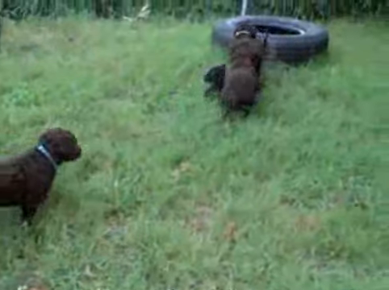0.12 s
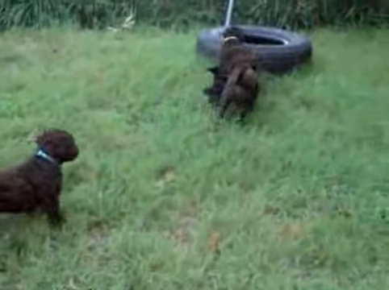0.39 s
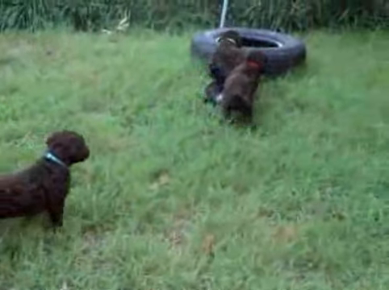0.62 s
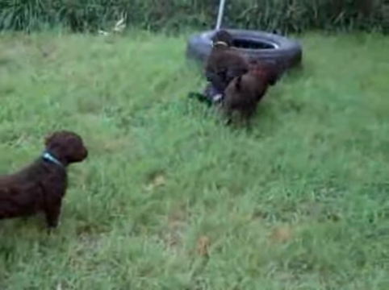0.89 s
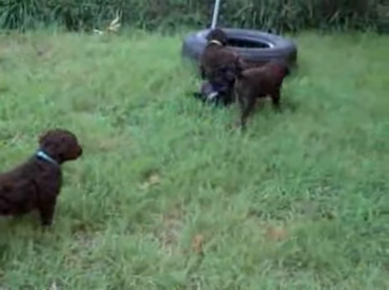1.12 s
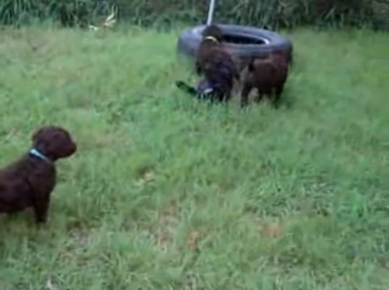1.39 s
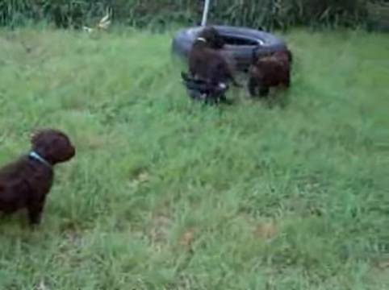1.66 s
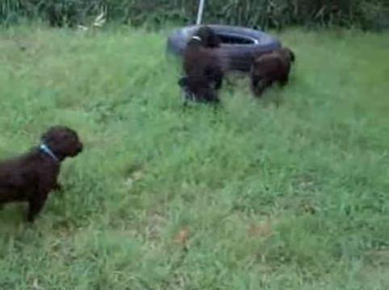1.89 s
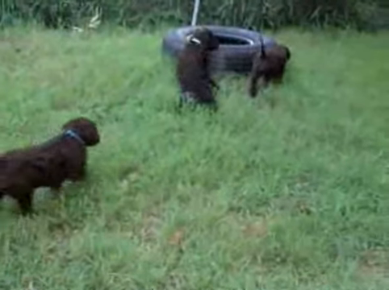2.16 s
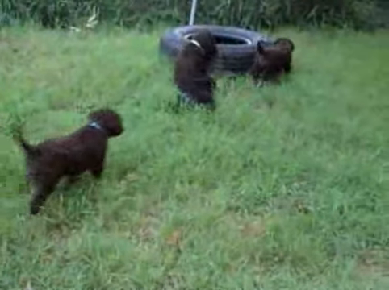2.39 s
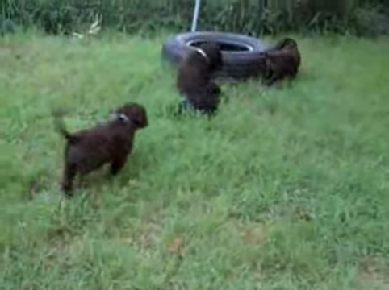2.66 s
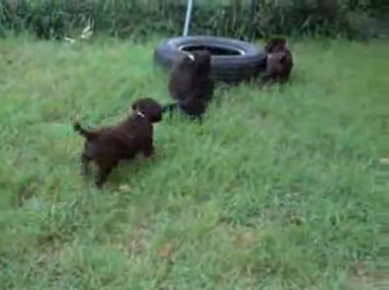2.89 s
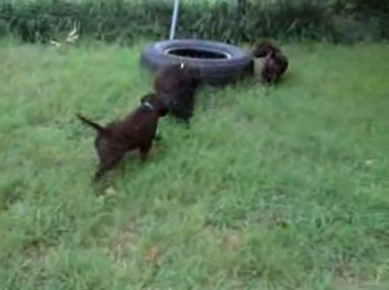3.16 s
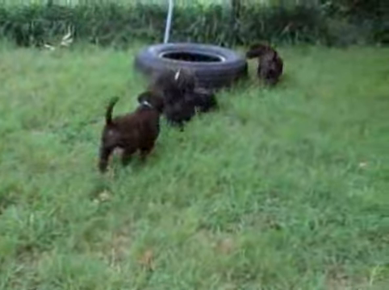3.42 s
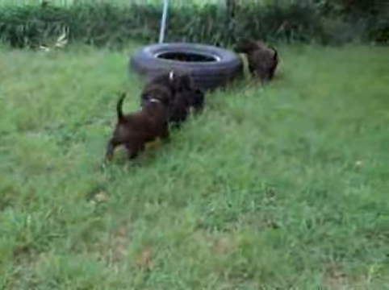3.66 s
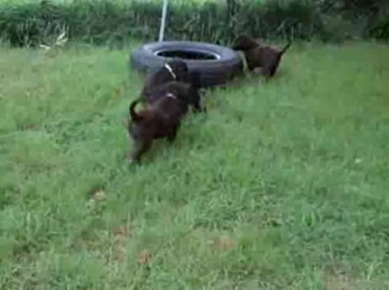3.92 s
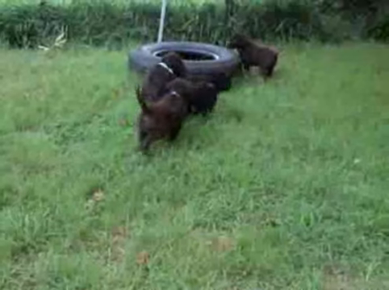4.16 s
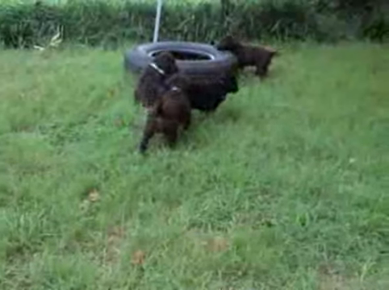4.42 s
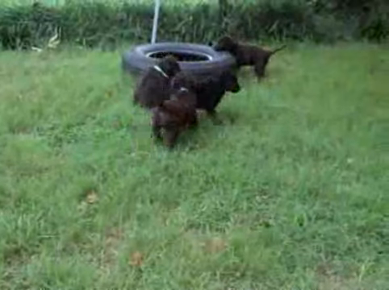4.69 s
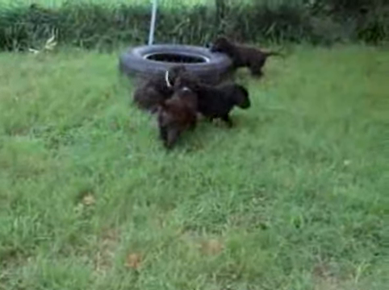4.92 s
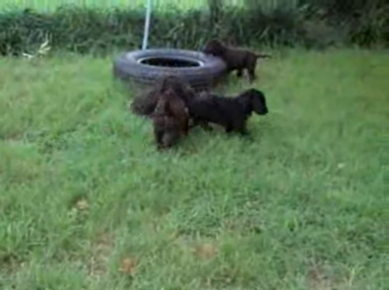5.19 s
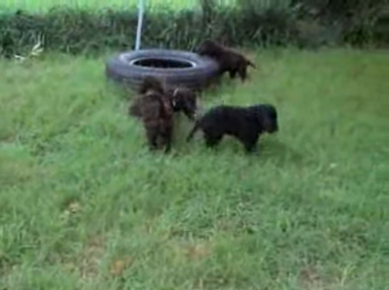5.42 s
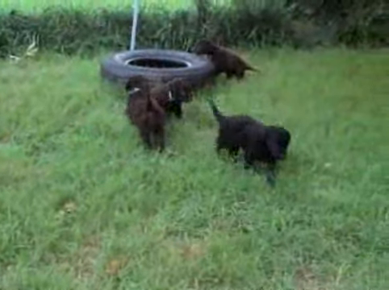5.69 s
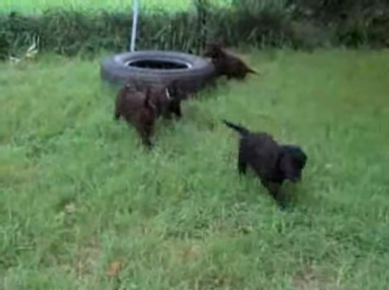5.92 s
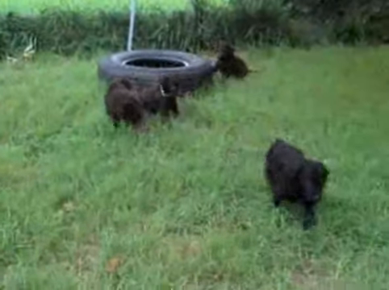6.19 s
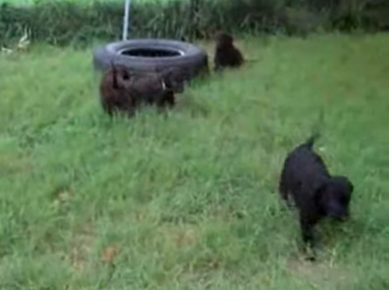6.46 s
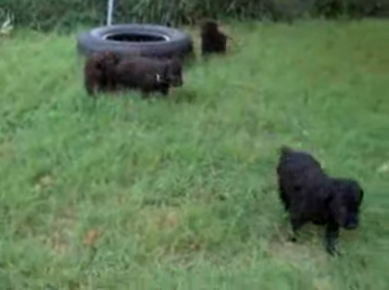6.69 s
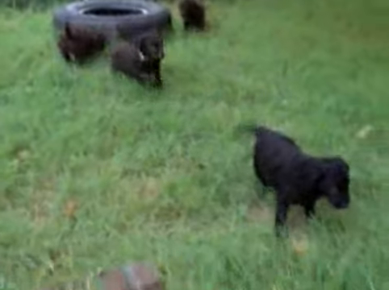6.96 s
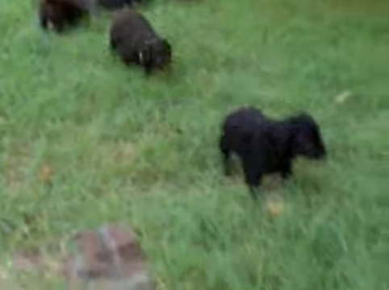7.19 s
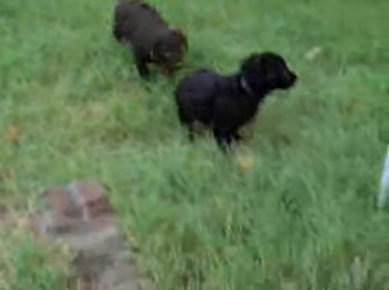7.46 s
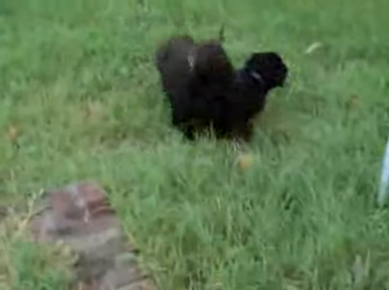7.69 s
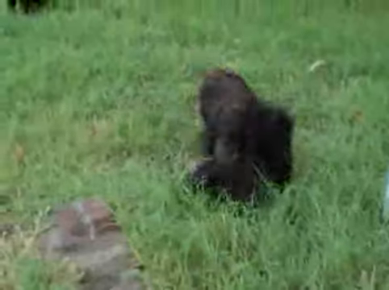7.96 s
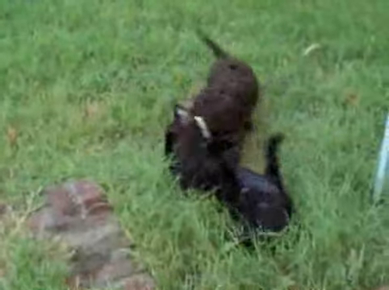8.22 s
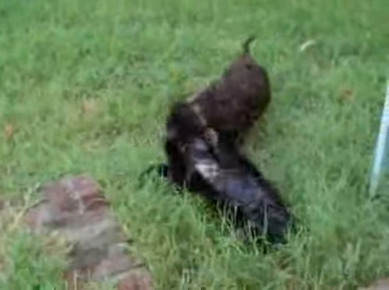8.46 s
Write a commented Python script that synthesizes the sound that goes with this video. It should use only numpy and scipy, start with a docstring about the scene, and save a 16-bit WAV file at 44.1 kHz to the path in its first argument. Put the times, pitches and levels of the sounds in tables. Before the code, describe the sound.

Summer insects shimmer continuously in a grassy yard, brief trills repeating from the bushes, while tumbling puppies give just one tiny raspy yelp and a dull knock.

```python
"""A steady insect chorus, over distant traffic, rumble and machine hum: shaped noise and wavering tones.
In 16 ms steps the level flutters in bands and the top treble blinks on and off.
A pulsing trill from the bushes follows: overtones ringing in a body. Puppies tumble on a lawn on a
summer day, far under it: a hoarse yelp (rough pulses and breath through a throat), later a soft bump
(a decaying sine). Muting of sunken bands leaves a watery grain."""
import sys
import numpy as np
from scipy import signal
from scipy.fft import rfft, irfft
from scipy.io import wavfile
from scipy.ndimage import uniform_filter1d

SR = 44100
rng = np.random.default_rng(int(sys.argv[2]) if len(sys.argv) > 2 else 0)


def int16_out(signal):
    """Quantize to a 16-bit WAV file."""
    q = np.round(np.clip(np.atleast_2d(signal).T, -1, 1) * 32767)
    wavfile.write(sys.argv[1], SR, q.astype(np.int16))


def voltage_ratio(level):
    """Linear amplitude factor for a level in decibels (scalar or array-like)."""
    return 10 ** (np.asarray(level, float) / 20)


N = 378814
HOP, BLINK_S = 128, .016
FFT_SIZE = 8 * HOP
HZ, FRAME_S = np.fft.rfftfreq(FFT_SIZE, 1 / SR), np.arange(N // HOP + 9) * HOP / SR

# insect chorus, relative swell of its loudest band: t/s, level/dB
CHORUS_SWELL = [(0, -0.5), (2.5, -0.5), (3.9, 0), (4.15, -2), (4.8, -1.5), (6.2, -1.5), (6.9, -4.5),
                (7.2, 0), (7.6, -4.5), (8, -1.5), (8.59, -4)]
# insect chorus, relative spectrum: f/Hz, density/dB per Hz
CHORUS_SPECTRUM = [(2300, -27), (3300, -10), (4000, -9), (4700, -12.5), (5200, -8), (5720, -2),
                   (5980, -1.5), (6120, -13), (6400, -11.5), (7250, -13.5), (7330, -50.5), (7600, -40),
                   (8550, -51), (8680, -25), (10000, -43.5), (10200, -89.5)]
# long dropouts of the top treble: t/s, length/s
TREBLE_GAPS = [(.33, .16), (.94, .31), (2.24, .27)]
# distant traffic drawing away: t/s, level/dB
TRAFFIC_LEVEL = [(0, -41.5), (2.4, -41), (4.3, -42.5), (6.3, -43.5), (8.59, -44.5)]
# traffic wash, relative spectrum: f/Hz, density/dB per Hz
TRAFFIC_SPECTRUM = [(300, -12), (700, -3.5), (1200, -3.5), (2000, -1.5), (2800, -1.5), (3800, -9.5),
                    (5000, -47.5), (7000, -42.5)]
# low rumble, relative spectrum: f/Hz, density/dB per Hz
RUMBLE_SPECTRUM = [(12, -10.5), (28, 1.5), (45, -1), (80, 2.5), (115, -1), (135, -6.5), (250, -8.5),
                   (400, -10), (800, -17), (1600, -54.5)]
# far machines: f/Hz, wavering/Hz, level/dB (before the tone and fuzz weights), from/s, to/s
HUM_TONES = [(54.2, 0.973, -45, -1, 10), (92.8, 2.13, -49.5, 1.2, 5.9), (114.3, 3.12, -55, -1, 10),
             (174.4, 2.03, -58, -1, 10), (241.1, 3.2, -60, -1, 10), (290, 2.3, -63, -1, 10),
             (828, 3.01, -66, -1, 10)]
# trills in the bushes: t/s, length/s, level/dB (before the taper), centre of the ringing f/Hz
TRILL_CALLS = [(0.528, .16, -42.5, 4000), (1.253, 0.097, -42.5, 4070), (1.504, .13, -47, 3840),
               (1.907, .13, -42, 4040), (2.412, 0.13, -41, 4080), (2.573, .13, -42, 4000),
               (3.235, 0.2, -40.5, 3920), (3.927, 0.14, -41, 3820), (4.14, .19, -41, 3960),
               (4.48, .21, -41, 4020), (4.97, .23, -40, 3890), (5.654, 0.15, -43.5, 3930),
               (6.196, .14, -43, 3980), (6.654, .13, -40.5, 4220), (6.752, .12, -41.5, 3880),
               (7.424, 0.24, -38.5, 3960), (7.72, .09, -45, 3950), (8.25, .3, -43.5, 3880)]
# yelp: t/s, length/s, effort/dB, starting pitch f/Hz
YELPS = [(3.152, .075, -38.5, 345)]
# throat resonances: f/Hz, width/Hz, level/dB
THROAT_RESONANCES = [(640, 350, -3), (830, 460, -4.5), (1020, 420, -3.5)]
# bodies bumping: t/s, peak/dB, ring f/Hz, time to fall 30 dB/s
BODY_BUMPS = [(7.670, -33, 534, 0.01)]

CHORUS_DB, RUMBLE_DB = -35.5, -42
# share of the time the top treble is heard, outside the gaps
TREBLE_SHARE, TREBLE_SHARE_GAIN_PER_S = .43, .025
TREBLE_DB, TREBLE_FADE_DB_PER_S = 3, 0.8
TRILL_PULSES_HZ, TRILL_FALL_HZ_PER_S = 195.5, 1700
YELP_RISE_S, YELP_FADE_DB, YELP_SAG_HZ_PER_S, YELP_BREATH_SHARE = .004, -18, 600, .68
NOTCH_HZ, NOTCH_HALF_WIDTH_HZ = 3900, 95


def evened(x):
    """Scales to rms 1."""
    return x / np.sqrt(np.mean(x ** 2) + 1e-20)


def read(points, hz):
    """Reads a spectrum on a log-frequency axis."""
    f, value = np.transpose(points)
    return np.interp(np.log(hz + 1), np.log(f + 1), value)


def follow(rows, t):
    """Reads a two-column curve at the times t."""
    s, value = np.transpose(rows)
    return np.interp(t, s, value)


def add(mix, s, sound):
    """Mixes a sound in at s seconds."""
    part = mix[round(s * SR):][:len(sound)]
    part += sound[:len(part)]


def resonate(x, hz, width_hz):
    """Resonance: shifts the curve hz down to zero, smooths twice, shifts back."""
    turn = np.exp(2j * np.pi * np.cumsum(hz * np.ones(len(x))) / SR)
    r = np.exp(-np.pi * width_hz / SR)
    smooth = signal.lfilter([(1 - r) ** 2], [1, -2 * r, r * r], x / turn)
    return 2 * (turn * smooth).real


def noise(field_db):
    """Random short-time spectra under a frames x bins field of dB, at rms 1."""
    a, b = np.moveaxis(rng.standard_normal((len(FRAME_S), len(HZ), 2)), 2, 0)
    z = (a + 1j * b) * voltage_ratio(field_db)
    return evened(signal.istft(z.T, nperseg=FFT_SIZE, noverlap=FFT_SIZE - HOP)[1][:N])


def patches(frames, bins):
    """A smooth random field over time and frequency, at rms 1."""
    field = rng.standard_normal((len(FRAME_S), len(HZ)))
    field = uniform_filter1d(field, frames, axis=0)
    return evened(uniform_filter1d(field, bins, axis=1))


def blinks(carry):
    """One random value per 16 ms step, held over its frames; carry ties it to the one before."""
    step = (FRAME_S / BLINK_S).astype(int)
    draws = rng.standard_normal(step[-1] + 2)
    return evened(draws[1:] + carry * draws[:-1])[step]


def top_treble_db():
    """The top treble blinks on and off at random in short steps, mostly off in the gaps."""
    gap = sum((FRAME_S > s) & (FRAME_S < s + length) for s, length in TREBLE_GAPS)
    share = np.where(gap, .04, TREBLE_SHARE + TREBLE_SHARE_GAIN_PER_S * FRAME_S)
    off = 1 / (1 + np.exp(-1.7 * blinks(.4))) > share  # the logistic makes the draw near uniform
    edge_hz = np.where(blinks(.8) > .2, 6050, 6400)
    level_db = TREBLE_DB - TREBLE_FADE_DB_PER_S * FRAME_S - 26 * off + 3 * blinks(0.085)
    return level_db[:, None] * (HZ > edge_hz[:, None]) * (abs(HZ - 7960) > 660)


def band_flutter_db():
    """The level of three bands flutters in short random steps, each band by itself."""
    flutter_db = 2.8 * blinks(-.3)[:, None] * (HZ > 5250) * (HZ < 6050)
    flutter_db += 2.2 * blinks(-.2)[:, None] * (HZ > 4300) * (HZ < 5250)
    flutter_db += 3.5 * blinks(0.83)[:, None] * (abs(HZ - 7960) < 660)
    return flutter_db


def chorus():
    """Many insects blur into noise bands; apart from the insects, band levels flutter and the top treble drops
    out in 16 ms steps."""
    swell_db = follow(CHORUS_SWELL, FRAME_S)[:, None] * (HZ > 5250) * (HZ < 6050)
    field = read(CHORUS_SPECTRUM, HZ) + swell_db + 1.35 * patches(6, 5)
    return voltage_ratio(CHORUS_DB) * noise(field + band_flutter_db() + top_treble_db())


def traffic():
    """Road wash: lightly mottled noise under a level curve."""
    wash = noise(read(TRAFFIC_SPECTRUM, HZ) + .8 * patches(10, 4))
    return voltage_ratio(follow(TRAFFIC_LEVEL, np.arange(N) / SR)) * wash


def rumble():
    """Low rumble: steady noise weighted in its spectrum."""
    spectrum = rfft(rng.standard_normal(N)) * voltage_ratio(read(RUMBLE_SPECTRUM, np.fft.rfftfreq(N, 1 / SR)))
    return voltage_ratio(RUMBLE_DB) * evened(irfft(spectrum, N))


def machine_hum():
    """Far machines: sines wandering in pitch, each wrapped in a narrow band of noise."""
    t, hum = np.arange(N) / SR, np.zeros(N)
    for hz, width_hz, db, start, stop in HUM_TONES:
        fuzz = evened(resonate(rng.standard_normal(N), hz, 4 * width_hz))
        drift = evened(uniform_filter1d(rng.standard_normal(N), 4000))
        wander = np.cumsum(drift) * width_hz / SR  # turns
        heard = np.clip(np.minimum(t - start, stop - t) / 0.52, 0, 1)
        tone = np.sin(2 * np.pi * (hz * t + wander))
        hum += heard * voltage_ratio(db) * (1.61 * tone + 0.45 * fuzz)
    return hum


def trill():
    """Steady pulses ring in a body; echoes in the foliage make each overtone swell and slip by itself."""
    t = np.arange(N) / SR
    waver = uniform_filter1d(rng.standard_normal((len(FRAME_S), 9, 2)), 16, axis=0)
    waver = uniform_filter1d(waver, 8, axis=0)
    swell_db, slip_turns = 3.5 * evened(waver[..., 0]), .16 * evened(waver[..., 1])
    pulses, calls = np.zeros(N + SR), np.zeros(N)
    for k in range(9):  # overtones 16 to 24
        turns = (16 + k) * TRILL_PULSES_HZ * t + np.interp(t, FRAME_S, slip_turns[:, k])
        pulses[:N] += voltage_ratio(np.interp(t, FRAME_S, swell_db[:, k])) * np.cos(2 * np.pi * turns)
    for s, length, db, hz in TRILL_CALLS:
        part = pulses[round(s * SR):][:round(length * SR)]
        ring_hz = hz + TRILL_FALL_HZ_PER_S * np.linspace(length / 2, -length / 2, len(part))
        ring = resonate(part, ring_hz, 430) + .45 * part
        add(calls, s, voltage_ratio(db) * evened(ring) * signal.windows.tukey(len(part), .9))
    return calls


def yelp(length, effort_db, top_hz):
    """Uneven pulses and puffs of breath pass a small throat; the pitch sags as the effort fades."""
    t = np.arange(0, length, 1 / SR)
    hz = top_hz - YELP_SAG_HZ_PER_S * t
    jitter = 0.25 * uniform_filter1d(rng.standard_normal(len(t)), 100)
    turns = np.cumsum(hz * (1 + jitter)) / SR
    folds = sum(np.cos(2 * np.pi * k * turns) for k in range(1, 6))
    puffs = (.3 + np.exp(-(turns % 1) / 0.32)) * rng.standard_normal(len(t))
    puffs = resonate(puffs, 700, 900)
    drive = (1 - YELP_BREATH_SHARE) * evened(folds) + YELP_BREATH_SHARE * evened(puffs)
    throat = sum(voltage_ratio(db) * resonate(drive, f, w) for f, w, db in THROAT_RESONANCES)
    fade_db = YELP_FADE_DB * (t / length) ** 2
    return np.minimum(t / YELP_RISE_S, 1) * voltage_ratio(effort_db + fade_db) * evened(throat)


def bump(peak_db, hz, fall_30db_s):
    """A padded blow: a sine with a soft onset and a fast exponential decay."""
    t = np.arange(1500) / SR
    ring = (1 - np.exp(-t / 0.001)) * voltage_ratio(-30 * t / fall_30db_s) * np.sin(2 * np.pi * hz * t)
    return voltage_ratio(peak_db) * ring / abs(ring).max()


def scene():
    """Puppies under the sounds of the yard."""
    mix = chorus() + traffic() + rumble() + machine_hum() + trill()
    for s, *voice in YELPS:
        add(mix, s, yelp(*voice))
    for s, *blow in BODY_BUMPS:
        add(mix, s, bump(*blow))
    return mix[None]


def mute_sunken_bands(x):
    """The camera mutes narrow bands that sink under the sound around them, leaving a watery grain."""
    hz, _, z = signal.stft(x, SR, nperseg=1408, noverlap=1056)
    hz = hz[:, None]
    power_db = 10 * np.log10(abs(z) ** 2 + 1e-16)
    near_db = uniform_filter1d(uniform_filter1d(power_db, size=3, axis=0), size=5, axis=1)
    around_db = uniform_filter1d(uniform_filter1d(power_db, size=41, axis=0), size=9, axis=1)
    # quiet spells sink more often
    around_db = 0.6114 * around_db + .4 * around_db.mean(1, keepdims=True)
    # so does the thin stretch under the insects
    around_db += .8 * (abs(hz - 2500) < 550)
    # one band is muted most of the time
    around_db += 5.5 * np.exp(-((hz - NOTCH_HZ) / NOTCH_HALF_WIDTH_HZ) ** 4)
    sunk = 1 / (1 + np.exp(np.clip((near_db - around_db + 1.3) / .7, -30, 30)))
    # deeper towards the treble, slight in the insects' band
    depth = np.clip(hz / 1700, 0, 1.4) * np.where((hz > 4300) & (hz < 7400), .12, 1)
    muted_db = -15 * sunk * depth
    return signal.istft(z * voltage_ratio(muted_db), SR, nperseg=1408, noverlap=1056)[1][:N]


def low_pass(x):
    """Removes everything above the highest recorded frequency."""
    return signal.sosfilt(signal.butter(12, 10230, fs=SR, output="sos"), x)


def record(dry):
    """Camera sound: the muting of sunken bands over the whole mix."""
    finished = mute_sunken_bands(dry[0])[None]
    return low_pass(finished)


dry = scene()
out = record(dry)
int16_out(out)
```